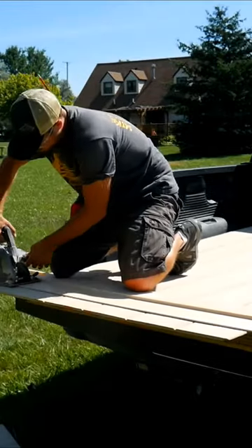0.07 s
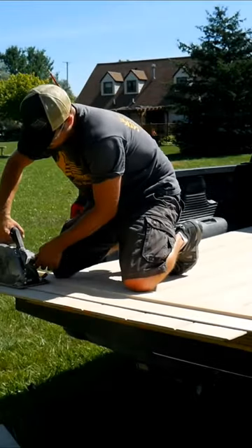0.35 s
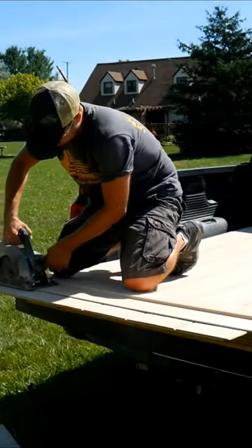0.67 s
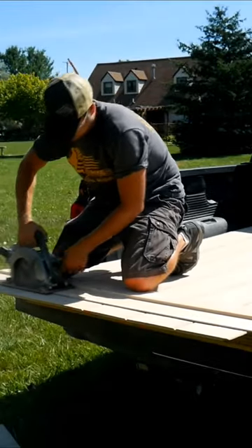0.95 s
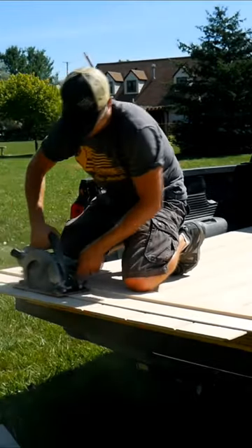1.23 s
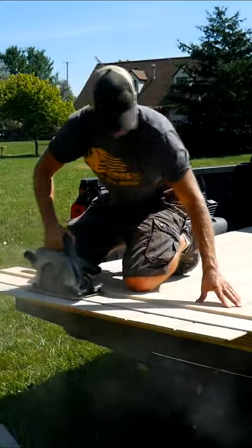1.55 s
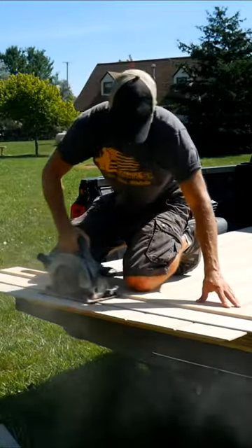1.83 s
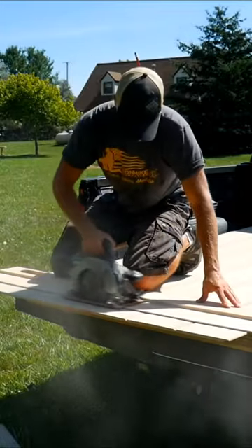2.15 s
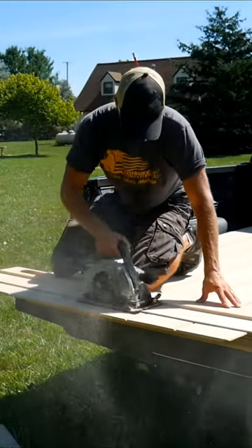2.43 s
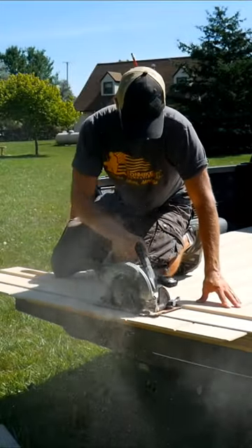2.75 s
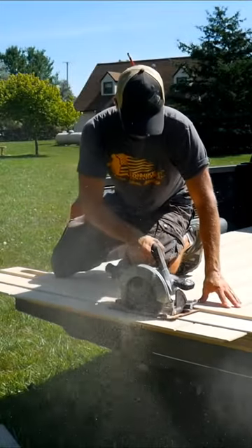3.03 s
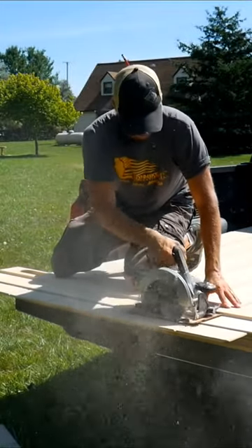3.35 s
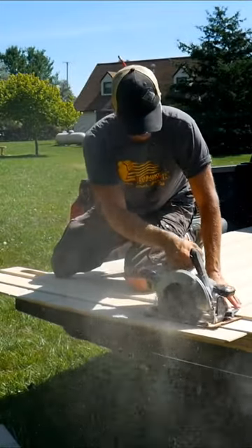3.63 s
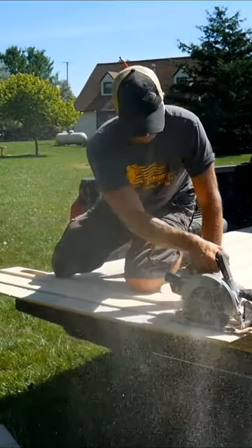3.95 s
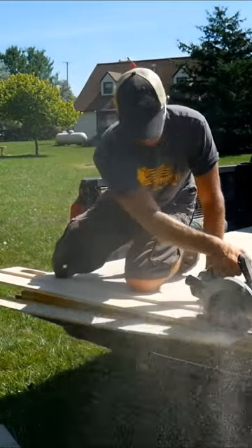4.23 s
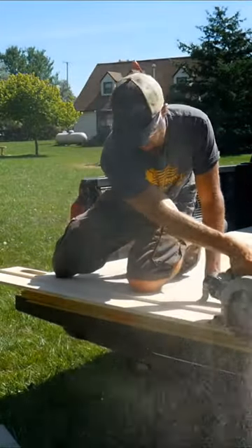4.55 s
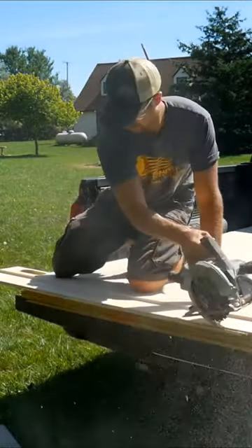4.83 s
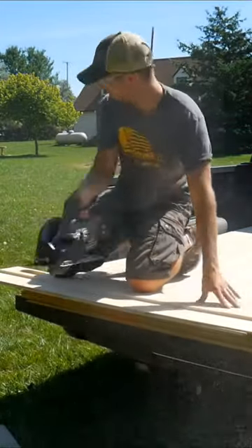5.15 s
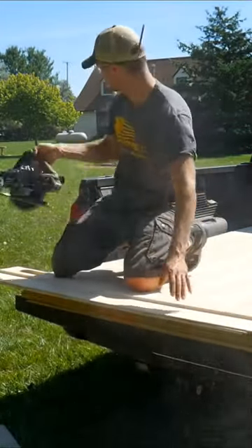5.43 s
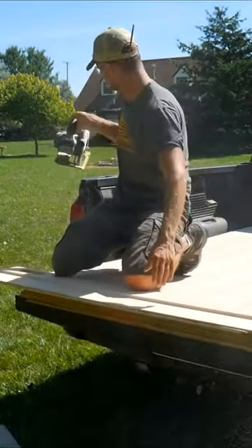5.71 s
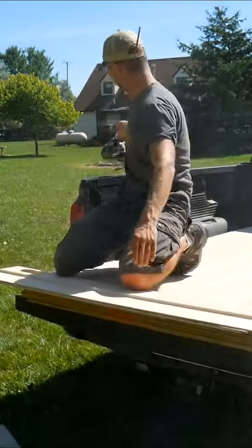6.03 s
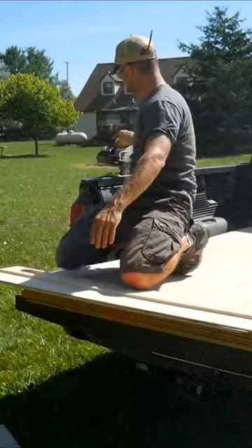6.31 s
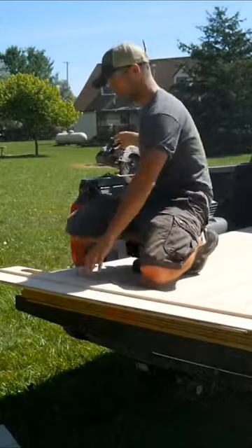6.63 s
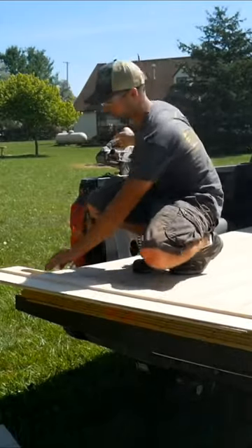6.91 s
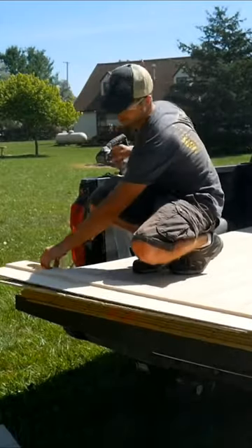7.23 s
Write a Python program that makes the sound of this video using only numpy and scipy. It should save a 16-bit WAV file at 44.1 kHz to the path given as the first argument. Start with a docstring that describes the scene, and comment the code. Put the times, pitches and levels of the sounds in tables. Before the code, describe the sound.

A hand-held circular saw cuts through a wooden panel close by, with a harsh rasp, a wavering whine and a hiss of chips. Its pitch sinks under load, rises as the blade comes free, then the sound breaks off. The offcut drops and clatters. Faint scuffs follow, and the saw is set down on a truck bed with a hollow thud. The outdoor air behind is very quiet.

```python
"""A hand-held circular saw with a 24-tooth blade cuts a wooden panel on a truck bed, outdoors. Its teeth tear
the wood with a rasp and a spray of chips, and the blade whines and slows under load. It speeds up as it leaves
the wood, then its sound breaks off abruptly; the offcut drops and clatters. Cloth and boots rub on the panel,
and the saw is set down with a hollow thud that rings the bed. Behind it all are still air, faint insects and an
engine humming far away."""
import sys
import numpy as np
from scipy import signal
from scipy.fft import rfft, irfft, next_fast_len
from scipy.io import wavfile
from scipy.ndimage import uniform_filter1d, map_coordinates

SR = 44100
rng = np.random.default_rng(int(sys.argv[2]) if len(sys.argv) > 2 else 0)


def to_wav(s):
    """Save 16-bit WAV."""
    ch = np.atleast_2d(s).T  # columns
    pcm = np.round(np.clip(ch, -1, 1) * 32767)  # PCM
    wavfile.write(sys.argv[1], SR, pcm.astype(np.int16))


N = 320607
TIME = np.arange(N) / SR
TEETH, LOADED_SPEED = 24, 43.9   # the speed under heavy load, in turns per second
DRUM_CENTRE_S, DRUM_LENGTH_S = 2.12, 5.1   # the panel drums most in the middle of the cut
CUTOFF_HZ = 15700


def from_db(db):
    """Turn decibels into a gain."""
    return 10 ** (np.asarray(db) / 20)


def rms_one(x):
    """Scale a sound so that its average strength (rms) is 1."""
    return x / np.sqrt(np.mean(x ** 2) + 1e-20)


def in_time(rows):
    """Join (time, value) points with straight lines, giving a value for every sample."""
    return np.interp(TIME, *np.transpose(rows))


def noise():
    """White noise for the whole scene."""
    return rng.standard_normal(N)


def colour(x, spectrum):
    """Shape a sound with a curve of (f/Hz, relative level/dB) points; rms 1."""
    size = next_fast_len(N)
    hz, db = np.transpose(spectrum)
    bins = np.fft.rfftfreq(size, 1 / SR) + 1
    gain = from_db(np.interp(np.log(bins), np.log(hz), db))
    return rms_one(irfft(rfft(x, size) * gain, size)[:N])


def drift(rate_hz):
    """A smooth random wander, about 1 in size; a higher rate wanders faster."""
    step = 40   # samples between random points
    r = np.exp(-2 * step * np.pi * rate_hz / SR)
    slow = signal.lfilter([1], [1, -2 * r, r * r], rng.standard_normal(N // step + 2002))[2000:]
    return np.interp(np.arange(N) / step, np.arange(len(slow)), rms_one(slow))


def resonate(x, resonances):
    """Pass a sound through several resonances side by side and add them up."""
    return sum(from_db(db) * signal.lfilter(*signal.iirpeak(hz, hz / width, fs=SR), x)
               for hz, width, db in resonances)


def response(pitch, centre_hz, width_hz):
    """Gain of a gliding tone as it passes a resonance; 1 at the centre."""
    return 1 / (1 + (2 * (pitch - centre_hz) / width_hz) ** 2)


def band_pass(x, low_hz, high_hz, order):
    """Keep what lies between two frequencies; a higher order gives steeper edges."""
    return signal.sosfilt(signal.butter(order, [low_hz, high_hz], "band", fs=SR, output="sos"), x)


def band(x, low_hz, high_hz):
    """One frequency band of a sound; rms 1."""
    return rms_one(band_pass(x, low_hz, high_hz, order=2))


def dying(t, t60):
    """A fade that falls by 60 dB in t60 seconds."""
    return np.exp(-np.log(1000) * t / max(t60, 1e-3))


def mode(t, hz, t60):
    """One natural note of a struck object: a sine wave that dies away."""
    return np.sin(2 * np.pi * hz * t) * dying(t, t60)


def swell(centre_s, length_s):
    """A rounded rise and fall around a moment."""
    return np.cos(np.pi * np.clip((TIME - centre_s) / length_s, -.5, .5))


def swells(rows):
    """The gains of several swells added up."""
    return sum(from_db(db) * swell(s, length) for s, length, db in rows)


def add(out, start_s, sound):
    """Mix a sound into a track at a given time."""
    at = int(start_s * SR)
    out[at:at + len(sound)] += sound[:N - at]


def tone(cycles, flutter_db, flutter_hz, smear):
    """A machine tone whose level flutters and whose phase jitters by about `smear` radians; rms 1."""
    level = from_db(flutter_db * drift(flutter_hz))
    return rms_one(level * np.sin(2 * np.pi * cycles + smear * drift(22)))


def reflected(x, strength, count):
    """Short echoes off panel, guard and body come and go as the saw moves."""
    lags = rng.uniform(.001, .009, count) * SR
    return x + strength * sum(drift(2.11) * np.roll(x, int(lag)) for lag in lags)


def bites(turns, repeat, depth, wobble_db):
    """Teeth tear the wood: the share `repeat` is alike on every turn, the rest is fresh chips."""
    size, alike = 1024, 0
    for edge in rng.standard_normal((2, size)):   # the pattern of the edges shifts with the grain
        alike += drift(1.2) * map_coordinates(edge, [turns % 1 * size], order=3, mode="grid-wrap")
    alike /= np.sqrt(uniform_filter1d(alike ** 2, size=4000) + 1e-6)   # even out its level
    force = np.sqrt(repeat) * alike + np.sqrt(1 - repeat) * noise()
    per_tooth = 1 + depth * np.cos(2 * np.pi * TEETH * turns)
    wobble = from_db(wobble_db * np.sin(2 * np.pi * turns))   # one side of the blade bites deeper
    return force * per_tooth * wobble


def rasp(force, turns, chatter):
    """The bites shake the panel and the shoe (the saw's base plate); whirring tones ride on top."""
    # tone colour of the rasp: f/Hz, relative level/dB
    spectrum = [(30, -51), (100, -21), (220, -14.5), (350, -13), (520, -8.5), (660, -8), (745, -7),
                (820, -1.5), (1200, 0.5), (1500, -2), (2050, -4.5), (3000, -6), (3600, -4), (4400, -9.5),
                (6000, -25)]
    # resonances of the shoe and the panel under it: f/Hz, width/Hz, level/dB
    shoe = [(827, 8.3, -1), (914, 130, -3.5), (1190, 60, -8.5), (1400, 25, -3.5), (1710, 35, -4),
            (3300, 520, -15.5)]
    # whirring tones: multiple of the blade speed, relative level/dB
    whirr_tones = [(18, -28.5), (21, -19.5), (25, -20), (27, -20), (28, -20.5), (33, -17), (36, -23),
                   (39, -21.5), (42, -22), (48, -17.5), (96, -23.5), (120, -28)]
    tearing = colour(force + resonate(force, shoe), spectrum)
    whirr = sum(from_db(db) * tone(multiple * turns, flutter_db=4.5, flutter_hz=9, smear=chatter)
                for multiple, db in whirr_tones)
    return tearing + whirr


def blade_ring(speed, turns):
    """The bites ring the blade's plate, fully once the load has pulled it down to LOADED_SPEED."""
    # resonances of the plate: f/Hz, width/Hz, relative level/dB
    plate = [(2495, 80, 8.5), (2610, 110, 8), (2700, 100, -5.5)]
    level_db = -37.5 - 0.75 * np.maximum(speed - LOADED_SPEED, 0)
    force = bites(turns, repeat=0.2, depth=0.47, wobble_db=3.0)
    return from_db(level_db) * rms_one(resonate(force, plate))


def chip_spray(turns):
    """Chips fly off the teeth in an uneven hiss; fine dust hisses higher still and slowly fades."""
    # loudness of the spray: t/s, level/dB
    levels = [(0.0, -34.5), (.07, -37), (.09, -40), (.16, -36.5), (0.54, -41), (0.84, -37), (1.13, -40),
              (1.23, -37.5), (1.94, -38), (2.25, -37), (2.9, -37.5), (3.74, -38.5), (4.21, -35),
              (4.25, -41), (4.41, -34.5), (4.55, -40.5)]
    # tone colour of the spray: f/Hz, relative level/dB
    spectrum = [(2500, -24.5), (4400, -6), (5050, 4.5), (5700, -2), (7450, -1.5), (7820, 4.5), (8150, 3.5),
                (8500, 3.5), (9000, 3), (10100, 0.5), (11000, -2.5), (15500, -10)]
    chips = bites(turns, repeat=0.068, depth=0.42, wobble_db=0.3)
    chips *= from_db(0.63 * drift(150) + 1.2 * drift(24))
    chips = reflected(chips, strength=.18, count=12)
    dust = from_db(-44.5 - 4 * TIME) * band(noise(), 10000, 13000)
    return from_db(in_time(levels)) * colour(chips, spectrum) + dust


def whine(turns, biting):
    """A tone at three times the tooth rate flares each time the blade binds in the cut."""
    # moments of binding: centre t/s, length/s, level/dB
    binds = [(0.02, 0.17, -40), (.29, 0.45, -44.5), (.53, .17, -34.5), (.66, 0.1, -45), (.77, 0.099, -39),
             (.87, 0.13, -35), (1.17, 0.31, -49), (1.62, 0.24, -43.5), (1.75, 0.13, -42), (2.0, 0.2, -36),
             (2.1, 0.098, -38), (2.31, 0.066, -40), (2.43, 0.12, -44), (2.61, 0.12, -39.5),
             (2.87, 0.09, -46), (3.18, 0.089, -51), (3.31, 0.26, -45), (3.49, 0.14, -38.5),
             (3.66, 0.28, -52), (3.79, 0.11, -42.5), (4.1, 0.11, -45)]
    level = biting * from_db(-48.5 + 0.5 * drift(4)) + swells(binds)
    return level * tone(3 * TEETH * turns, flutter_db=2.5, flutter_hz=60, smear=0.89)


def blade_song(speed, wobble):
    """The blade sings as its tone passes the plate's resonance; chips shake it and add a rough burr."""
    # surges as the saw is pushed harder: centre t/s, length/s, level/dB
    surges = [(1.03, 0.21, -42), (1.4, .22, -54), (1.9, 0.17, -42.5), (2.17, 0.11, -38), (2.47, 0.28, -46),
              (2.76, 0.25, -43), (3.07, 0.11, -39.5), (3.35, 0.21, -38.5), (3.59, 0.097, -42.5),
              (4.44, 0.2, -39)]
    resonance_hz, width_hz, plate_hz = 2546, 960, 2450
    drive_hz = 57.5 * speed
    level = from_db(-46) * response(drive_hz, resonance_hz, width_hz) + swells(surges)
    pull = .75 * response(drive_hz, plate_hz, width_hz=230)   # the plate's own note draws the pitch in
    cycles = np.cumsum(drive_hz + pull * (plate_hz - drive_hz)) / SR
    song = level * wobble * tone(cycles, flutter_db=2.0, flutter_hz=30, smear=0.35)
    burr_level = from_db(-42.5) * response(drive_hz, resonance_hz, width_hz / 2)
    burr = tone(cycles + drift(33) / 4, flutter_db=2.5, flutter_hz=60, smear=1.0)
    return song + burr_level * burr


def tooth_tone(speed, turns):
    """Teeth strike the wood one after another, making a tone that grows as the blade slows."""
    level_db = -51 - 0.6 * (speed - LOADED_SPEED)
    return from_db(level_db) * tone(TEETH * turns, flutter_db=0.5, flutter_hz=3.8, smear=0.18)


def motor_hum(speed, turns):
    """The motor's hum swells near a panel resonance and beats with a tone at five times blade speed."""
    motor_ratio = 5.18   # motor turns per blade turn
    resonance = response(motor_ratio * speed, centre_hz=247, width_hz=48)
    level = from_db(-50) * swell(DRUM_CENTRE_S, DRUM_LENGTH_S) * resonance
    throb = .65 * tone(5 * turns, flutter_db=3.5, flutter_hz=4.3, smear=0.1)
    hum = tone(motor_ratio * turns, flutter_db=4.0, flutter_hz=7.5, smear=0.35)
    return level * (hum + throb)


def squeals(turns, chatter):
    """Now and then another multiple of the blade speed catches a resonance and squeals."""
    # squeals: centre t/s, length/s, multiple of the blade speed, level/dB
    catches = [(0.083, 0.57, 15.4, -39), (.12, 0.26, 24, -38.5), (.17, .4, 120, -53),
               (0.58, 0.74, 24, -40.5), (.73, 0.095, 24, -40.5), (1.05, 0.38, 24, -39.5),
               (1.45, 0.41, 18, -46.5), (1.62, 0.12, 20, -39), (1.64, 0.5, 39, -41), (1.83, 0.091, 24, -40),
               (2.451, 0.33, 12, -49), (2.738, 0.37, 95.7, -45.5), (2.93, .15, 28, -37),
               (3.33, 0.12, 33, -44.5), (3.72, 0.34, 36, -46), (3.8, 0.98, 120, -50), (4.07, 0.24, 21, -39),
               (4.28, 0.19, 67, -38), (4.34, 0.42, 46, -45)]
    out = np.zeros(N)
    for s, length, multiple, db in catches:
        squeal = tone(multiple * turns, flutter_db=3, flutter_hz=25, smear=chatter)
        out += from_db(db) * swell(s, length) * squeal
    return out


def saw():
    """One blade speed drives the tones and the tearing of the wood, until the sound breaks off."""
    # the blade slows under load and speeds up as it comes free: t/s, speed/(turns per s)
    speeds = [(0, 54.3), (.12, 52.1), (.2, 51.2), (.42, 50), (.5, 48.4), (.68, 47.2), (.82, 47.4),
              (.9, 46.7), (1.05, 46), (1.17, 46.2), (1.3, 47.8), (1.48, 48.6), (1.6, 48), (1.68, 47.2),
              (1.76, 47.6), (1.92, 47.2), (1.98, 46.5), (2.05, 46.4), (2.1, 45.7), (2.35, 44), (2.42, 42.4),
              (2.6, 43.4), (2.85, 44.2), (3.02, 43.5), (3.16, 44.3), (3.32, 43.2), (3.5, 42.8), (3.7, 41.7),
              (3.95, 41), (4.22, 39.5), (4.3, 40.6), (4.5, 46.3), (4.57, 46.7)]
    exit_s, exit_length_s, stop_s = 4.4, 0.065, 4.572
    speed = in_time(speeds)
    turns = np.cumsum(speed * (1 + .0012 * drift(12))) / SR
    free = np.clip((TIME - exit_s) / exit_length_s, 0, 1)   # 0 in the cut, 1 out of the wood
    biting = from_db(-23 * free)
    chatter = np.interp(TIME, [1.1, 1.8], [.42, .95])   # phase jitter in radians, more deep in the cut
    force = bites(turns, repeat=0.4, depth=.4, wobble_db=0.14)
    force *= from_db(1.1 * drift(25))   # the grain makes the bites uneven
    force = reflected(force, strength=0.17, count=10)
    out = from_db(-33 - 2 * free) * rasp(force, turns, chatter)
    out += blade_ring(speed, turns) + chip_spray(turns)
    out += from_db(-64) * swell(DRUM_CENTRE_S, DRUM_LENGTH_S) * band(force, 170, 330)   # panel drums
    wobble = 1 + 0.13 * np.sin(2 * np.pi * turns + drift(4.8))   # the level sways once a turn
    out += wobble * whine(turns, biting) + blade_song(speed, wobble)
    out += biting * tooth_tone(speed, turns) + motor_hum(speed, turns) + squeals(turns, chatter)
    running = np.clip((stop_s - TIME) / 0.003 + 1, 0, 1)
    return running * out


def air():
    """Still outdoor air is a soft, steady hush."""
    # tone colour of the air: f/Hz, relative level/dB
    spectrum = [(30, -1), (100, 5), (300, -5.5), (1000, -12), (3000, -16.5), (6000, -22), (9300, -18),
                (12500, -23), (14000, -35.5)]
    return from_db(-79) * colour(noise(), spectrum)


def insects():
    """A thin, far trill in the grass, made from a narrow band of noise."""
    return from_db(-95.5) * band(noise(), 2880, 2980)


def engine():
    """Only an engine's low firing tones carry from far away; the hum swells, holds and fades."""
    # firing tones: multiple of the engine speed, level at the loudest/dB
    firing_tones = [(3, -68.5), (6, -82)]
    engine_hz, loudest_s, leaves_s = 27.1, 4.7, 6.2
    rise_db = np.clip(13.5 * (TIME - loudest_s), -14, 0)
    fade_db = 12.5 * np.maximum(TIME - leaves_s, 0)
    cycles = np.cumsum(engine_hz * (1 + 0.0011 * drift(2.4))) / SR
    hum = sum(from_db(db) * np.sin(2 * np.pi * multiple * cycles) for multiple, db in firing_tones)
    return from_db(rise_db - fade_db) * np.sqrt(2) * hum


def rustle():
    """Each shift of the body is one uneven swell of rubbing cloth."""
    # cloth and boots slide on the panel: centre t/s, length/s, level/dB
    slides = [(4.6, 0.16, -46), (4.81, 0.22, -56.5), (4.98, 0.33, -69), (6.7, 0.78, -84.5),
              (7.197, 0.47, -80.5)]
    # tone colour of the cloth: f/Hz, relative level/dB
    spectrum = [(100, -12), (400, -2.5), (1300, 1.5), (2500, -8.5), (4200, -12), (7000, -25), (15000, -42)]
    return swells(slides) * from_db(1.8 * drift(4.4)) * colour(noise(), spectrum)


def knocks():
    """Offcut, shoe and hands knock on the panel; a harder blow rings higher and brighter."""
    # blows: t/s, level/dB, ring f/Hz, t60/s
    blows = [(4.525, -16.5, 476, 0.056), (4.543, -20.5, 490, 0.034), (4.557, -17, 1165, 0.041),
             (4.583, -27, 1700, 0.064), (4.594, -19.5, 1400, 0.09), (4.611, -29, 1230, 0.065),
             (4.625, -30.5, 550, 0.058), (4.646, -37.5, 640, 0.13), (4.691, -34.5, 850, 0.13),
             (4.71, -33, 833, 0.07), (4.722, -35, 880, 0.1), (4.7438, -22, 800, 0.031),
             (4.749, -30, 490, 0.091), (4.767, -28.5, 502, 0.053), (4.79, -30, 463, 0.054),
             (4.797, -30, 467, 0.049), (4.861, -29, 640, 0.05), (4.864, -26.5, 1063, .07),
             (4.876, -31.5, 1004, 0.13), (4.892, -33, 1060, 0.076), (4.947, -45, 994, 0.14),
             (5.078, -52, 1380, 0.056), (5.137, -38.5, 495, 0.067), (7.18, -53.5, 3100, 0.14)]
    # the panel's main modes: f/Hz, relative level/dB, share of the blow's t60
    panel_modes = [(279, -23, 1.6), (443, -19.5, 1.5), (795, -20.5, 1.1), (1028, -17, 0.79),
                   (1360, -18.5, .8), (1800, -26, 0.76), (2400, -25, 0.98), (3090, -29.5, .6)]
    # the wood's many crowded modes, as bands of noise:
    # low f/Hz, high f/Hz, relative level/dB, rise/(dB per octave of ring pitch), share of the t60
    wood_bands = [(150, 620, -19.5, -2.5, 0.9), (600, 1900, -16.5, -1, 0.57),
                  (2000, 3800, -33.5, 14.5, 0.45), (4180, 11000, -36.5, 9, 0.92)]
    middle_hz, tilt_db = 800, 5.5
    out, t = np.zeros(N), TIME[:SR // 2]
    for s, level_db, ring_hz, t60 in blows:
        hardness = np.log2(ring_hz / middle_hz)
        blow = from_db(-9.5) * mode(t, ring_hz, min(t60, 60 / ring_hz))   # wood rings briefly
        for hz, db, share in panel_modes:
            bright_db = tilt_db * hardness * np.log2(hz / middle_hz)
            strength = rng.choice([-1, 1]) * from_db(db + bright_db + rng.normal(0, 1.5))
            shifted_hz = hz * np.exp(.09 * rng.normal())   # each blow lands on another spot
            blow += strength * mode(t, shifted_hz, share * t60)
        for low_hz, high_hz, db, rise_db, share in wood_bands:
            burst = band(rng.standard_normal(len(t)), low_hz, high_hz)
            blow += from_db(db + rise_db * hardness) * burst * dying(t, share * t60)
        attack = 1 - dying(t, 0.0011)
        add(out, s, from_db(level_db) * blow * attack)
    return band_pass(out, 110, 8500, order=3)   # only the range between 110 Hz and 8.5 kHz is kept


def clacks():
    """The guard snaps shut and the shoe strikes: each a sharp spike, a crackle and a metal ring."""
    # hard contacts: t/s, peak level/dB, low f/Hz, high f/Hz
    contacts = [(4.5918, -18.5, 1290, 8800), (4.6103, -19.5, 1400, 3760), (4.6905, -40.5, 1800, 3800),
                (4.7213, -40, 3200, 3960), (4.7440, -32.5, 700, 2400), (4.7885, -39, 1300, 3580),
                (4.8605, -45, 1500, 8000)]
    # modes of guard and blade: f/Hz, relative level/dB, t60/s
    guard_modes = [(1655, -11, 0.012), (2175, -22, 0.04), (3490, -9, 0.012), (5140, -47, 0.3),
                   (5230, -47, .25), (7200, -33, 0.07), (8450, -35, .06)]
    out, t = np.zeros(N), TIME[:SR // 2]
    for s, peak_db, low_hz, high_hz in contacts:
        spike = t == 0
        crackle = from_db(-15.5) * rng.standard_normal(len(t)) * dying(t, t60=.004)
        ring = from_db(-13.5) * sum(from_db(db) * mode(t, hz, t60) for hz, db, t60 in guard_modes)
        snap = band_pass(spike + crackle + ring, low_hz, high_hz, order=2)
        add(out, s, from_db(peak_db) * snap / np.abs(snap).max())
    return out


def scuffs():
    """Hands, boots and shoe catch on the wood: a quick run of tiny slips through one broad resonance."""
    # scuffs: centre t/s, length/s, level/dB, resonance f/Hz
    rubs = [(5.448, .015, -76, 1204), (5.49, .07, -76, 1100), (5.528, 0.012, -72, 1700),
            (5.612, .04, -77, 1000), (5.639, 0.019, -75.5, 1300), (5.76, .05, -81, 1400),
            (5.888, 0.026, -76, 1500), (5.891, .025, -71, 3400), (6.181, .03, -78, 1600),
            (6.228, 0.062, -66, 1600), (6.23, 0.067, -57, 415), (6.33, .03, -61.5, 1704),
            (6.435, .03, -81, 3300), (6.857, .012, -76, 7500), (6.941, .09, -78, 3790)]
    slips_per_s, spread = 2500, 1.45   # the resonance spans this ratio either side of its centre
    out, t = np.zeros(N), TIME[:SR // 4]
    for s, length, db, hz in rubs:
        slips = rng.standard_normal(len(t)) * (rng.random(len(t)) < slips_per_s / SR)
        body = band_pass(slips, hz / spread, hz * spread, order=1)
        rub = band(body, hz / 3, min(hz * 2.5, CUTOFF_HZ))
        arch = np.sin(np.pi * np.minimum(t / length, 1))
        add(out, s - length / 2, from_db(db) * rub * arch)
    return out


def landing():
    """The weight of the saw sets the hollow truck bed booming; loose parts add a short rattle."""
    # the saw is set down: t/s, level/dB
    landings = [(6.257, -23.5)]
    # modes of the bed: f/Hz, relative level/dB, t60/s
    bed_modes = [(55.7, -23, 3.1), (89.2, -6, 0.77), (147.5, -9, 0.63), (177, -10, 0.51),
                 (223, -12.5, 0.62), (282, -4.5, 0.39), (353, -18, 0.17), (450, -13, 0.34),
                 (510, -3.5, 0.15), (637, -12.5, 0.29), (740, -28, .17), (1545, -16, 0.16),
                 (1640, -19, 0.2)]
    # tone colour of the rattle: f/Hz, relative level/dB
    spectrum = [(40, -37), (150, 9.5), (300, 3.5), (600, -10.5), (1500, -16.5), (3000, -29), (5000, -43),
                (8000, -54), (15000, -71)]
    out, t = np.zeros(N), TIME[:2 * SR]
    for s, level_db in landings:
        boom = sum((-1) ** k * from_db(db) * mode(t, hz, t60)
                   for k, (hz, db, t60) in enumerate(bed_modes))
        rattle = colour(noise(), spectrum)[:len(t)] * (dying(t, 0.21) + from_db(-16.5) * dying(t, 0.59))
        thud = from_db(-11) * boom + from_db(-6) * rattle
        attack = 1 - dying(t, 0.016)
        add(out, s, from_db(level_db) * thud * attack)
    return out


def scene():
    """All sources sit in the middle; open air adds only a trace of stereo width."""
    mid = air() + insects() + saw() + knocks() + clacks() + landing() + engine() + scuffs() + rustle()
    scatter = rng.standard_normal(SR // 30) * dying(TIME[:SR // 30], t60=.04)
    side = from_db(-31.5) * signal.fftconvolve(mid, scatter / np.linalg.norm(scatter))[:N]
    return np.array([mid + side, mid - side])


def record(dry):
    """The highest treble is cut off steeply."""
    return signal.sosfilt(signal.ellip(10, .2, 80, CUTOFF_HZ, fs=SR, output="sos"), dry)


dry = scene()
out = record(dry)
to_wav(out)
```